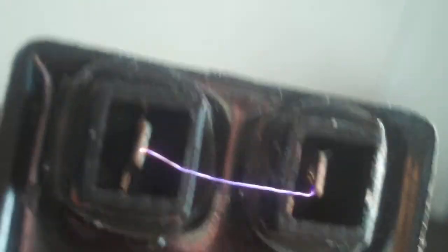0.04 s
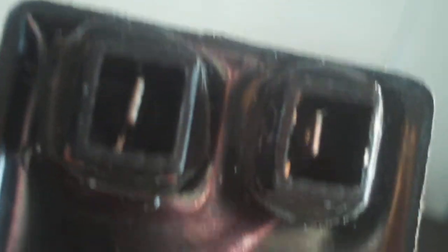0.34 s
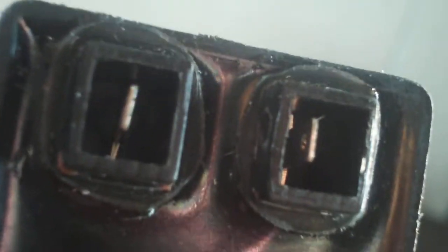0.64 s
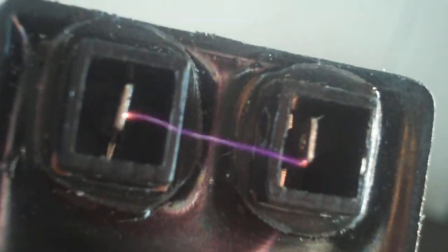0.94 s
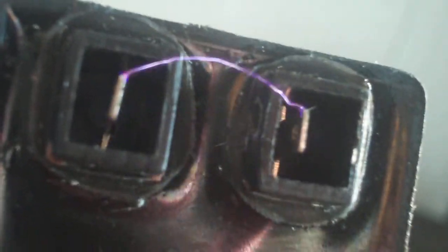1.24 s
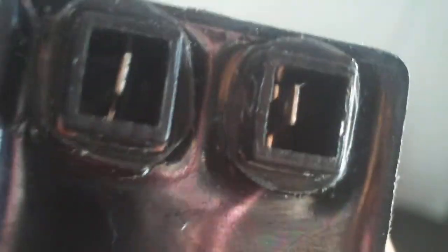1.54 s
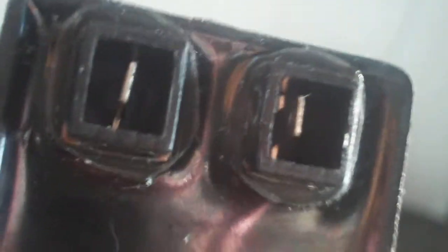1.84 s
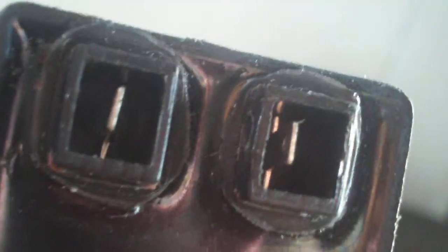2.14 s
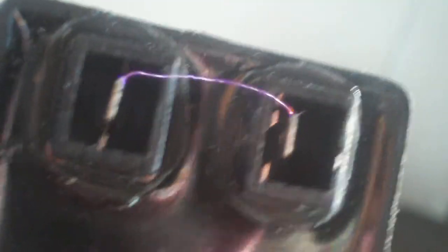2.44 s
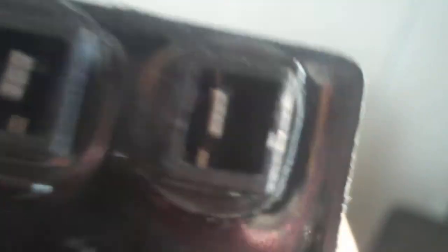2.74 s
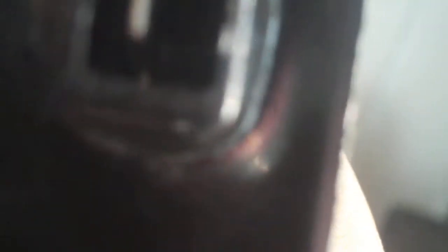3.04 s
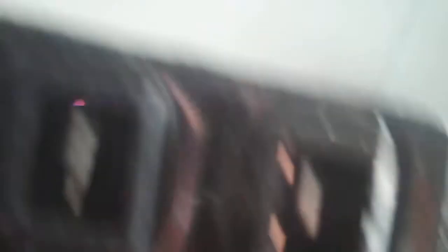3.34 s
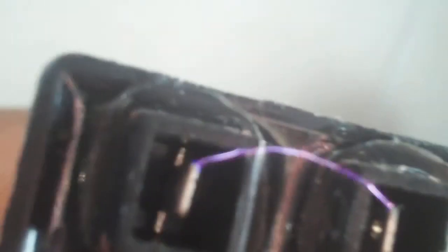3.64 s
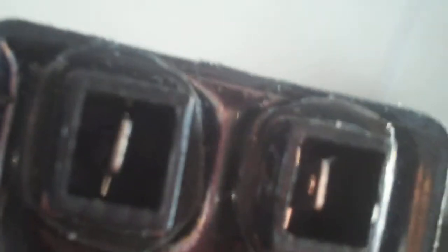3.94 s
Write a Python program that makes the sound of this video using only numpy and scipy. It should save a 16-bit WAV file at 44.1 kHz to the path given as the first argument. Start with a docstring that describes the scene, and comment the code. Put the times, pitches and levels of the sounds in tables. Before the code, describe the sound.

Sharp electric spark snaps start at once, about twelve a second, very close and slightly overloaded, with a faint high whine and a short small-room ring. At about 1.4 seconds they stop, leaving soft room air, and resume near 1.9 seconds. Faint handling rumble runs underneath. From about 2.9 seconds the snaps shift in tone and carry heavier low thumps on the microphone, continuing until 4 seconds.

```python
"""Sharp snaps start at once over a faint coil whine and room air: a spark generator fires across two
plug pins right at the microphone, about 12 times a second, with one short pause. Each snap rings the
plastic sockets, overloads the recorder and shoves the diaphragm into a low thump; a small room answers.
The charging coil whines between sparks. The device shifts in the hand, changing the ring of the snaps,
and the thumps grow heavier as it is brought closer."""
import sys
import numpy as np
from scipy import signal
from scipy.fft import rfft, irfft, next_fast_len
from scipy.io import wavfile
from scipy.ndimage import uniform_filter1d

SR = 44100
rng = np.random.default_rng(int(sys.argv[2]) if len(sys.argv) > 2 else 0)


def waveform_to_disk(signal):
    """Save audio, clipped to [-1, 1], as 16-bit WAV at the path in sys.argv[1]."""
    frames = np.transpose(np.atleast_2d(signal))
    scaled = np.clip(frames, -1, 1) * 32767
    samples = np.round(scaled).astype(np.int16)
    wavfile.write(sys.argv[1], SR, samples)


N = 176400

# room air colour (frequency [Hz], relative level [dB])
AIR_EQ = [(60, -3), (120, -2), (250, -7.5), (500, -13.5), (1000, -20), (1600, -23.5), (3000, -28.5),
          (7000, -32), (13500, -35), (15500, -46)]
# handling rumble colour (frequency [Hz], relative level [dB])
RUMBLE_EQ = [(8, -4.5), (18, 8), (30, 1), (50, -11.5), (100, -19.5), (250, -51.5), (1000, -91)]
# fader ride of the rumble (time [s], level [dB])
RUMBLE_RIDE = [(0, -37), (.55, -37), (.75, -28), (1.02, -30), (1.2, -39), (1.7, -38), (2.0, -33),
               (2.3, -26), (2.55, -36), (3.1, -39), (3.5, -37), (4, -35)]
# the hand rubs the case (centre time [s], half length [s], level [dB])
RUBS = [(0.358, 0.08, -52.5), (2.452, 0.15, -47)]
# rub colour (frequency [Hz], relative level [dB])
RUB_EQ = [(100, -12), (400, -0.5), (900, -1.5), (1400, -8), (3000, -28), (10000, -46)]
# steady electronic tones (frequency [Hz], level [dB])
TONES = [(3978, -77), (7865, -70)]
# reverb colour (frequency [Hz], relative level [dB])
ROOM_EQ = [(300, -34), (1200, -20.5), (2400, -13), (5000, -11), (6200, 2), (7400, 1.5), (8500, -10),
           (9500, -3.5), (11500, 1), (14000, 0), (15200, -3.5), (15700, -43)]
# reverb decay (frequency [Hz], t60 [s])
ROOM_T60 = [(1000, 0.29), (4000, 0.23), (7000, 0.17), (14000, 0.13)]
# spark cues and the weight of their thumps (time [s], thump level [dB])
SPARKS = [(0.0531, -23), (0.1326, -19.5), (0.2122, -20.5), (0.2918, -21.5), (0.3718, -19.5), (0.452, -25),
          (0.532, -24.5), (0.612, -24.5), (0.6926, -22.5), (0.7722, -19.5), (0.8522, -21), (0.932, -19),
          (1.0115, -18.0), (1.0916, -21.5), (1.1716, -20.5), (1.2515, -18.5), (1.3316, -23.5),
          (1.4117, -20.0), (1.8798, -22.5), (1.9597, -21.5), (2.0397, -19), (2.1193, -25), (2.1996, -20.5),
          (2.2794, -17.5), (2.3598, -21.5), (2.4397, -20.0), (2.52, -25.5), (2.6, -23), (2.68, -18.5),
          (2.7606, -16.5), (2.8406, -31), (2.921, -12.5), (3.0019, -14), (3.0824, -9.5), (3.163, -9.5),
          (3.2436, -8.5), (3.3243, -13.5), (3.4058, -11.5), (3.487, -20.5), (3.5681, -12.5), (3.6494, -14),
          (3.7305, -17), (3.8123, -18.5), (3.8925, -23), (3.9727, -16.0)]
# the hand takes a new position (time [s])
HAND_SHIFTS = [1.6, 2.88, 3.36]
# plastic socket modes (frequency [Hz], t60 [s], level in each of four hand positions [dB])
SOCKET_MODES = [(980, 0.0045, -30.5, -54, -13, -32), (2090, 0.005, -8, -4, -7, -47.5),
                (2484, 0.0072, -5.5, -7.5, -5, -4.5), (3476, 0.0024, 5, -2.5, 5.5, 4),
                (5375, 0.0054, -2, 0, -3, -8), (6040, 0.0071, -1, -14.5, -9, -17),
                (6370, 0.0089, -9, -5, -7, -11.5), (7263, 0.0045, 8, 3, 1, 6),
                (9695, 0.0054, -1.5, -6, 1, -2.5), (10660, 0.0041, 5, 1.5, 4.5, 2.5),
                (11975, 0.0067, 1.5, 0, -7.5, -3), (13256, 0.0051, -11, 2, -2, -2),
                (13956, 0.0081, -3.5, -1.5, -25, -3.5), (14500, 0.0031, 10, 7, 6, -5.5)]
# air resonance between sockets and microphone, following the hand (time [s], frequency [Hz], level [dB])
CAVITY = [(0, 7927, 5), (2.68, 7775, 5.5), (2.76, 7540, 4.5), (2.838, 6507, 8), (2.92, 7390, 8.5),
          (3.08, 7670, 7.5), (3.24, 7604, 8), (3.322, 7490, 8.5), (3.409, 6855, 4.5), (3.65, 6910, 10),
          (3.73, 6680, 7), (3.969, 6470, 7.5)]
# first reflections (delay [s], peak level [dB])
WALL_ECHOES = [(.0125, -28), (0.014, -21.5), (.0285, -26)]
# stereo width of the background (frequency [Hz], relative level [dB])
SIDE_EQ = [(25, 26.5), (70, 12), (150, -15), (300, -19.5), (1000, -42), (2200, -42), (4000, -47),
           (8000, -54)]
# stereo width of the snaps (frequency [Hz], relative level [dB])
SPREAD_EQ = [(100, -2), (300, 20), (1000, 6.5), (2200, -2.5), (4000, -8), (8000, -12), (14000, -15)]
# low-end panning (frequency [Hz], left over right [dB])
BALANCE = [(25, 2), (60, 1.6), (125, .2), (250, -1.5), (500, 0)]

WHINE_DB, WHINE_HZ, WHINE_SAG_HZ, RECHARGE_S = -45.5, 9910, 900, 0.022
RELEASE_S, FLICK_HZ, FLICK_S = 1.485, 259, 0.00825  # trigger let go: the unloaded coil flicks upward
ROOM_DB, ROOM_GAP_S, ROOM_BUILD_S, ROOM_GRAIN_DB = -24, 0.0046, 0.0062, 2
LATE_DB, LATE_T60_S = -18.5, 0.53  # the slow end of the reverb
CAVITY_T60_S, CRACK_DB, CRACK_T60_S = 0.0059, -13, 0.01
SCATTER_DB, DETUNE = 0.8, 0.003  # every arc takes a new path, varying each mode's level and pitch
THUMP_DELAY_S, THUMP_RISE_S, KICK_GAIN, KICK_S = 0.001, 0.00021, 1.096, 0.0013
SWING_GAIN, SWING_S, SWING_HZ = 0.55, 0.044, 11.2
AIR_DB, SIDE_DB, SPREAD_DB = -49.5, -45, -35
CLIP_LEVEL, HIGH_CUT_HZ = 0.96, 15900


def amp(db):
    """Decibels to gain."""
    return 10 ** (np.asarray(db) / 20)


def unit(x):
    """Normalise to rms 1."""
    return x / np.sqrt(np.mean(x ** 2) + 1e-20)


def along(points, hz):
    """Read a (frequency, value) curve on a log frequency axis."""
    freqs, values = np.transpose(points)
    return np.interp(np.log(hz + 1), np.log(freqs + 1), values)


def filtered(x, response):
    """Equalise x with a gain given as a function of frequency."""
    n = x.shape[-1]
    padded = next_fast_len(n + SR // 10)
    return irfft(rfft(x, padded) * response(np.fft.rfftfreq(padded, 1 / SR)), padded)[..., :n]


def noise(eq, size):
    """Coloured noise of rms 1."""
    return unit(filtered(rng.standard_normal(size), lambda hz: amp(along(eq, hz))))


def fade(t, t60):
    """Exponential decay, 60 dB down at t60."""
    return np.exp(-np.log(1000) * t / t60)


def add(track, start_s, sound):
    """Mix a sound into the track at its cue."""
    part = track[max(round(start_s * SR), 0):][:len(sound)]
    part += sound[:len(part)]


def background():
    """The bed: room air, faint electronic tones, and the rumble and rubbing of the hand."""
    t = np.arange(N) / SR
    rumble = amp(np.interp(t, *np.transpose(RUMBLE_RIDE))) * noise(RUMBLE_EQ, N)
    strokes = sum(amp(db) * np.exp(-((t - centre) / half) ** 2) for centre, half, db in RUBS)
    rubbing = strokes * noise(RUB_EQ, N)
    tones = sum(amp(db) * np.sin(2 * np.pi * hz * t) for hz, db in TONES)
    return amp(AIR_DB) * noise(AIR_EQ, N) + rumble + rubbing + tones


def coil_whine():
    """The coil's pitch sags at each spark and climbs as the capacitor recharges; it mutes in the pause."""
    t, cues = np.arange(N) / SR, np.array(SPARKS)[:, 0]
    lead_in_s = 2 * cues[0] - cues[1]  # one beat before the first spark
    since_spark = t - np.append(lead_in_s, cues)[np.searchsorted(cues, t)]
    sag = WHINE_SAG_HZ * np.exp(-since_spark / RECHARGE_S)
    flick = FLICK_HZ * np.exp(-np.abs(t - RELEASE_S) / FLICK_S)
    phase = 2 * np.pi * np.cumsum(WHINE_HZ - sag + flick) / SR
    running = (t < RELEASE_S) | (t > cues[cues > RELEASE_S][0])
    gate = uniform_filter1d(running * 1.0, size=200)
    return amp(WHINE_DB) * gate * np.sin(phase)


def room_tail():
    """The room answers with a grainy wash that builds after a short gap; the treble dies first."""
    hz, t, bands = signal.stft(noise(ROOM_EQ, SR // 2), SR, nperseg=256)
    decay = fade(t, along(ROOM_T60, hz)[:, None]) + amp(LATE_DB) * fade(t, LATE_T60_S)
    tail = signal.istft(bands * decay, SR, nperseg=256)[1]
    build = np.clip((np.arange(len(tail)) / SR - ROOM_GAP_S) / ROOM_BUILD_S, 0, 1)
    grain = unit(uniform_filter1d(rng.standard_normal(len(tail)), size=40))
    return tail * build * amp(ROOM_DB + ROOM_GRAIN_DB * grain)


def snap(cue):
    """One discharge: a noisy crack that rings the socket modes and the air cavity."""
    t = np.arange(SR // 50) / SR
    modes = np.array(SOCKET_MODES)
    when, cavity_hz, cavity_db = np.transpose(CAVITY)
    position = np.searchsorted(HAND_SHIFTS, cue)
    hz = np.append(modes[:, 0], np.interp(cue, when, cavity_hz))
    t60 = np.append(modes[:, 1], CAVITY_T60_S)
    db = np.append(modes[:, 2 + position], np.interp(cue, when, cavity_db))
    level_jitter, pitch_jitter = rng.standard_normal((2, len(hz)))
    rings = np.sin(2 * np.pi * np.outer(hz * (1 + DETUNE * pitch_jitter), t)) * fade(t, t60[:, None])
    crack = amp(CRACK_DB) * fade(t, CRACK_T60_S) * rng.standard_normal(len(t))
    return amp(db + SCATTER_DB * level_jitter) @ rings + crack


def sparks():
    """Every snap with its wall echoes and reverb; the room already rings at the start."""
    track = np.zeros(N)
    tail_age_s = SPARKS[1][0] - 2 * SPARKS[0][0]
    add(track, 0, room_tail()[round(tail_age_s * SR):])
    for cue, _ in SPARKS:
        hit = snap(cue)
        add(track, cue, hit)
        add(track, cue, room_tail())
        for delay, db in WALL_ECHOES:
            add(track, cue + delay + rng.normal(0, 0.00018), amp(db) * hit / np.abs(hit).max())
    return track


def diaphragm_thumps():
    """Each pressure pulse kicks the diaphragm, which swings slowly back."""
    track, t = np.zeros(N), np.arange(SR // 4) / SR
    attack = 1 - np.exp(-t / THUMP_RISE_S)
    kick = KICK_GAIN * np.exp(-t / KICK_S)
    swing = SWING_GAIN * np.exp(-t / SWING_S) * np.cos(2 * np.pi * SWING_HZ * t)
    for cue, db in SPARKS:
        add(track, cue + THUMP_DELAY_S, -amp(db) * attack * (kick + swing))
    return track


def scene():
    """A nearly mono mix: only a little low noise differs between the two sides."""
    side = amp(SIDE_DB) * noise(SIDE_EQ, N)
    return sparks() + coil_whine() + background() + np.array([side, -side])


def record(dry):
    """The snaps clip the input and thump the microphone; then slight width, panning and a high cut."""
    overloaded = np.clip(dry, -CLIP_LEVEL, CLIP_LEVEL) + diaphragm_thumps()
    envelope = np.sqrt(np.abs(uniform_filter1d(overloaded[0] ** 2, size=100)))
    sides = np.array([[1], [-1]])
    widened = overloaded + sides * amp(SPREAD_DB) * envelope * noise(SPREAD_EQ, N)
    panned = filtered(widened, lambda hz: amp(sides * along(BALANCE, hz) / 2))
    return filtered(panned, lambda hz: np.clip((HIGH_CUT_HZ - hz) / 1200 + 0.5, 0, 1))


dry = scene()
out = record(dry)
waveform_to_disk(out)
```